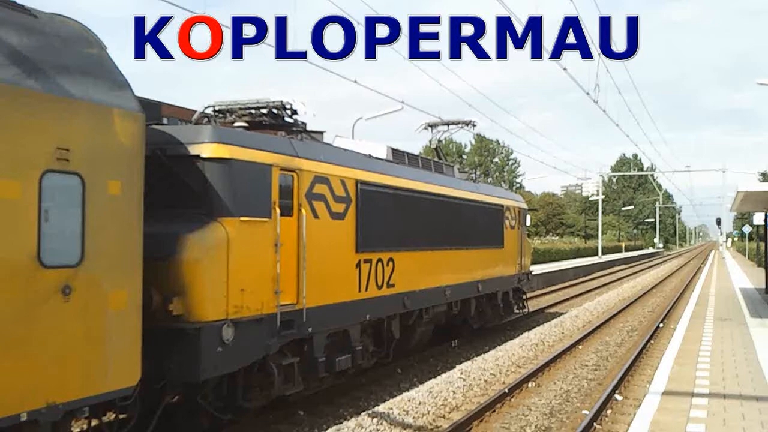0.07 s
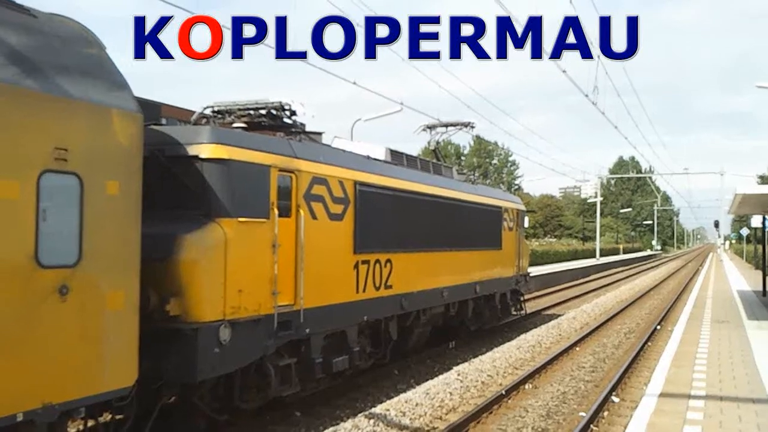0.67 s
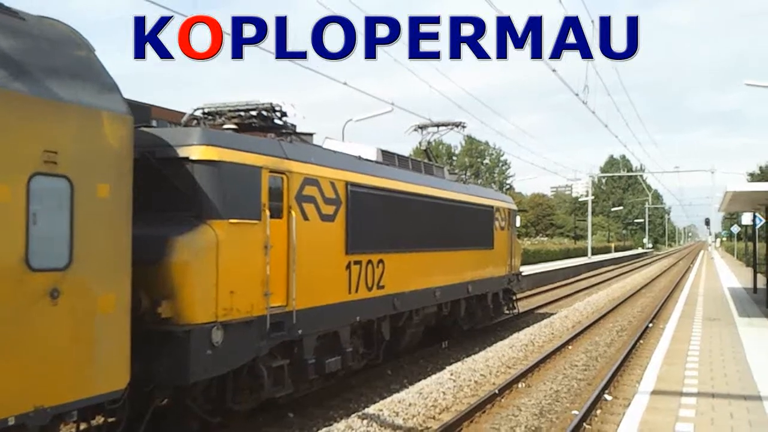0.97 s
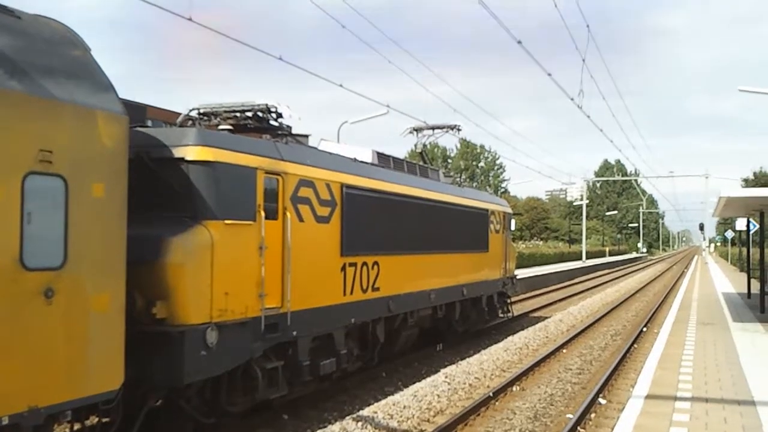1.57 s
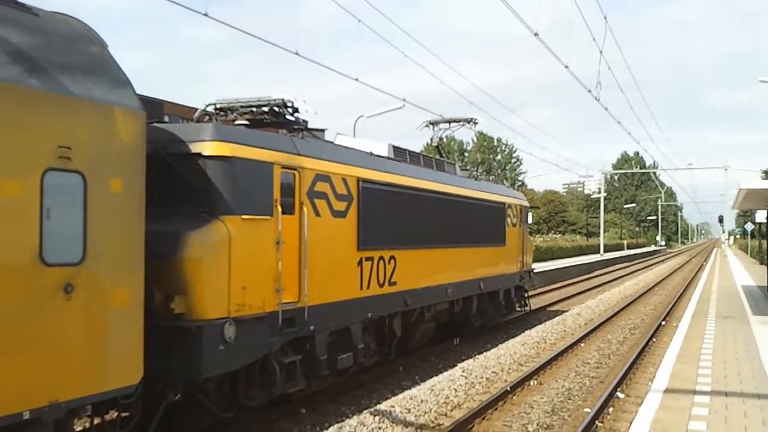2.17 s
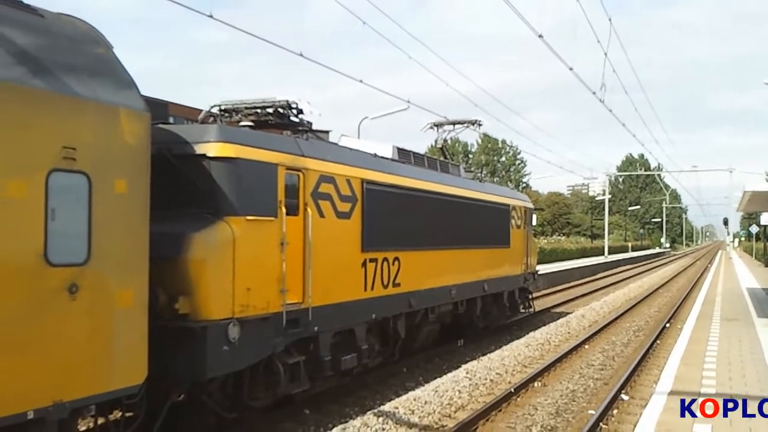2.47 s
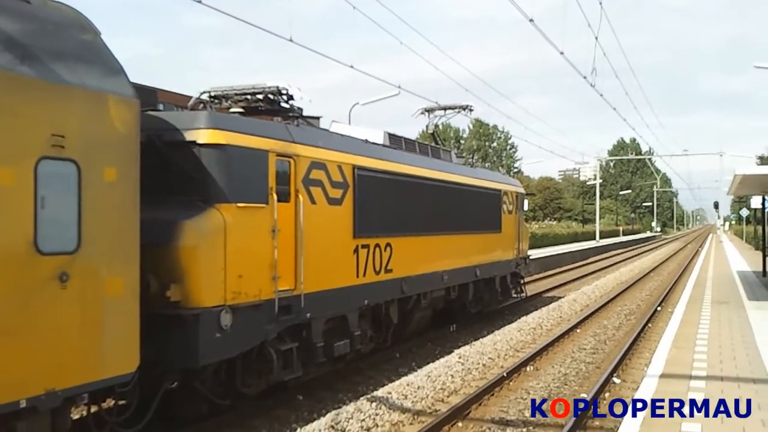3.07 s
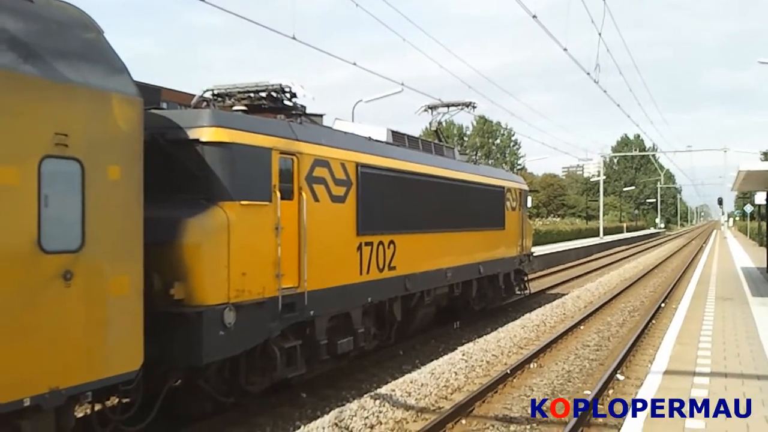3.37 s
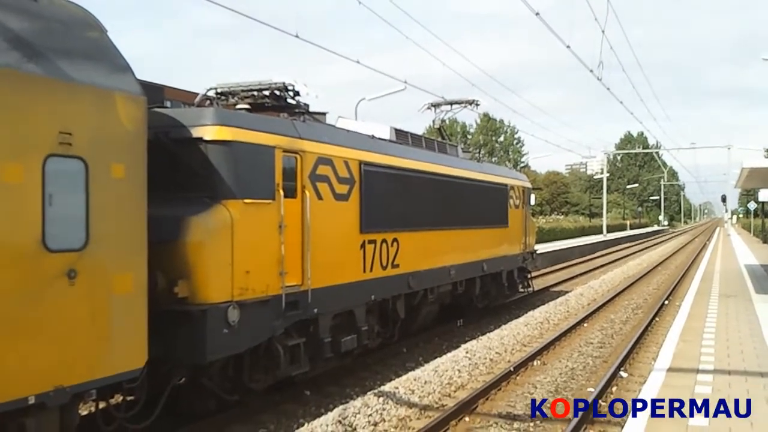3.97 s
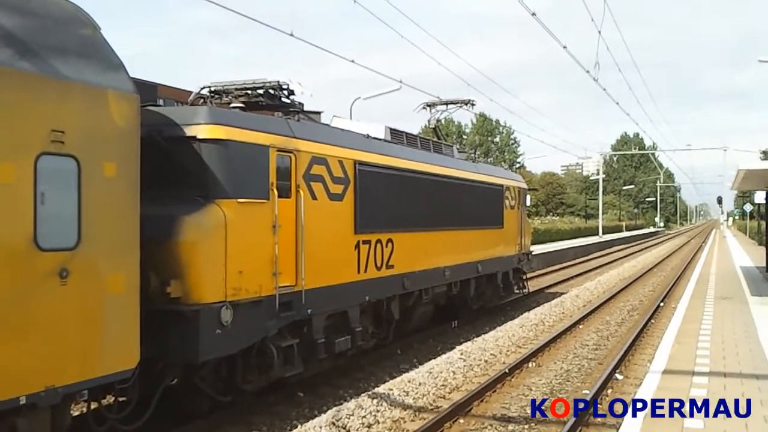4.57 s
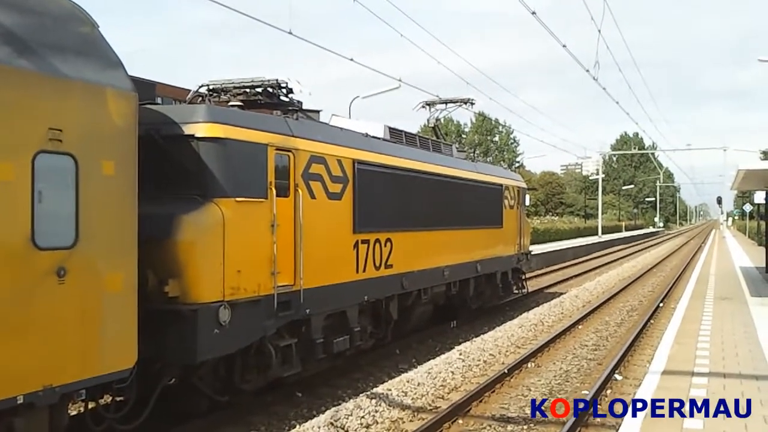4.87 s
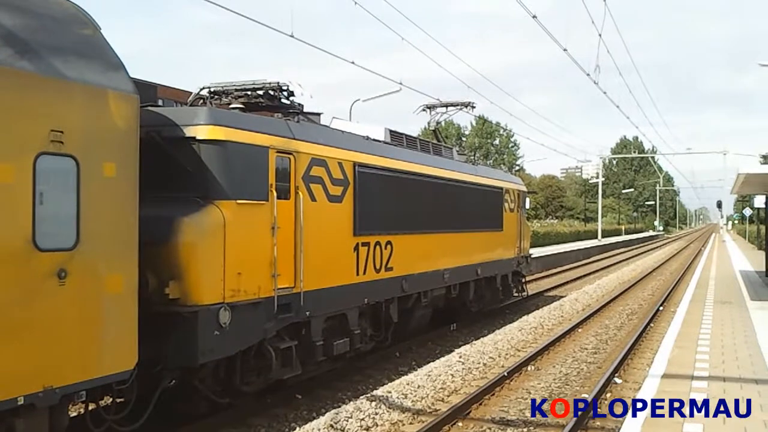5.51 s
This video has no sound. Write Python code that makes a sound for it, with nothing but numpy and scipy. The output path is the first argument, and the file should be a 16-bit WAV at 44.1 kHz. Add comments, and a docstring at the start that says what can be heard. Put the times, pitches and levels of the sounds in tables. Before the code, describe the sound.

An electric locomotive stands with its cooling blowers running, heard from an outdoor station platform. The sound fades in evenly from silence, starting at about 0.2 seconds and reaching full level by about 2 seconds. A low, booming fan hum throbs irregularly, with brief swells and lulls several times a second. With it comes a steady, slightly hollow rush of air and a light hiss from the side grilles. Faint whines from the fans hold their pitch and waver slightly in strength. At about 1.5 seconds a very faint, thin high hiss briefly rises and dies away. The hum swells a little more around 2.4, 3.7 and 4.4 seconds, while the air stays even. One tiny dry tick comes at about 5.4 seconds, and the blowers keep running to the end at roughly 5.5 seconds.

```python
"""Electric locomotive standing at a platform

Its cooling blowers run in the open air. The fan blades make a hum that throbs in the booming ducts.
Air rushes through the fans, rings the housing and hisses through the side grilles.
The fan shafts add faint steady whines; a brief thin hiss and one tiny tick are also heard.
The sound fades in over the first two seconds."""
import sys
import numpy as np
from scipy import signal
from scipy.fft import rfft, irfft
from scipy.io import wavfile
from scipy.ndimage import uniform_filter1d

SR = 44100
rng = np.random.default_rng(int(sys.argv[2]) if len(sys.argv) > 2 else 0)


def master(y):
    """Save y as 16-bit WAV."""
    cut = np.clip(np.atleast_2d(y).T, -1, 1)
    pcm = np.round(cut * 32767)  # scale
    wavfile.write(sys.argv[1], SR, pcm.astype(np.int16))


N = 244314
TIME = np.arange(N) / SR
FREQ = np.maximum(np.arange(N // 2 + 1) * SR / N, 1)


def gain(db):
    """Turn decibels into a number to multiply by."""
    return 10 ** (np.asarray(db) / 20)


def normalise(sound):
    """Scale a sound so that its average (rms) size is 1."""
    return sound / np.sqrt(np.mean(sound ** 2))


def curve(rows):
    """Join (time_s, value) rows with straight lines."""
    return np.interp(TIME, *np.transpose(rows))


def noise(shape):
    """Swirling air: noise of size 1, where shape says how strong each pitch is."""
    return normalise(irfft(rfft(rng.standard_normal(N)) * shape, N))


def drift(rate_hz):
    """A smooth random wobble that changes about rate_hz times a second."""
    return noise(np.exp(-(FREQ / rate_hz) ** 2))


def tone_shape(rows):
    """The strength of every pitch, drawn through (pitch_hz, level_db) rows."""
    hz, db = np.transpose(rows)
    return gain(np.interp(np.log(FREQ), np.log(hz), db, right=-120))


def ring_shape(rows):
    """One peak for each pitch that rings. Air stirs each on its own, so their powers add."""
    peaks = (gain(db) / (1 + ((FREQ - hz ** 2 / FREQ) / width) ** 2) for hz, width, db in rows)
    return np.sqrt(sum(peak ** 2 for peak in peaks))


# One tiny dry tick: start_s, level_db
TICK = (5.4232, -25)

def tick():
    """A single bright click that does not ring."""
    start_s, level_db = TICK
    return gain(level_db) * (np.arange(N) == int(start_s * SR))


# A short, faint swell of high hiss: middle_s, half_length_s, pitch_hz, width_hz, level_db
HISS_SWELL = (1.55, .08, 7700, 1800, -62.5)

def hiss_swell():
    """A thin hiss rises and dies away."""
    middle_s, half_length_s, pitch_hz, width_hz, level_db = HISS_SWELL
    hiss = noise(np.exp(-((FREQ - pitch_hz) / width_hz) ** 2))
    return hiss * gain(level_db) * np.exp(-((TIME - middle_s) / half_length_s) ** 2)


# The whines of the main blower shaft: cycles_per_turn, level_db
BLOWER_WHINES = [(1, -54.5), (6, -45), (12, -57.5), (18, -50.5), (54, -61.5), (60, -63.5)]
# The whines of a small fast fan: cycles_per_turn, level_db
SMALL_FAN_WHINES = [(3, -53), (8, -67), (15, -70), (16, -72.5), (18, -76.5), (19, -76)]

def shaft_whine(whines, spin_hz, wander, waver_db):
    """Tones follow one spinning shaft. Its speed wanders a little; moving air makes each tone waver."""
    turns = np.cumsum(spin_hz * (1 + wander * drift(2.9))) / SR
    sound = np.zeros(N)
    for cycles_per_turn, level_db in whines:
        strength = np.sqrt(2) * gain(level_db + waver_db * drift(8.6))
        sound += strength * np.sin(2 * np.pi * (cycles_per_turn * turns + rng.random()))
    return sound


# Air rushing through the fans: pitch_hz, relative_level_db
FAN_RUSH = [(12, -22.5), (24, -5), (33, 0.5), (110, -1), (230, 0.5), (420, -4), (680, -4.5), (930, -9.5),
            (1400, -9), (1620, -14), (2400, -23), (4200, -24.5), (6000, -42), (9000, -65)]
# The broad ringing of the housing and grilles: pitch_hz, width_hz, relative_level_db
HOUSING_RINGS = [(267, 70, 0), (476, 38, -1.5), (563, 165, 0), (659, 45, 0.5), (752, 38, 0),
                 (808, 69, -0.5), (1110, 130, -6.5), (1265, 187, -4), (1930, 570, -9), (2760, 550, -14.5),
                 (3710, 560, -21), (4840, 190, -23), (5440, 260, -28)]
# Air hissing past the grille slats: pitch_hz, relative_level_db
GRILLE_HISS = [(1500, -20.5), (2900, 2.5), (4200, 0.5), (4500, -5), (5100, -4.5), (5650, -5.5), (6250, -11),
               (7400, -14.5), (8000, -21), (8600, -21), (9500, -27.5), (10600, -28.5), (11000, -32),
               (12200, -36.5), (14000, -51.5)]
# The slow rise and fall of the air flow: time_s, change_db
AIR_FLOW = [(0.2, -1), (0.6, -0.5), (1.2, -0.5), (1.5, 0.1), (1.8, -0.16), (2.5, 1), (3.6, 0.7),
            (4.3, 0.74), (5.54, 0.8)]

def airflow(rush_db, housing_db, hiss_db):
    """Rush, housing and hiss swell and flutter together with the flow. The hiss also flickers alone."""
    rush = gain(rush_db) * noise(tone_shape(FAN_RUSH))
    treble_cut = 1 + (FREQ / 9000) ** 8  # the housing stops ringing above 9000 Hz
    housing = gain(housing_db) * noise(ring_shape(HOUSING_RINGS) / treble_cut)
    flicker_db = 0.67 * drift(rate_hz=70)
    hiss = gain(hiss_db + flicker_db) * noise(tone_shape(GRILLE_HISS))
    flutter_db = 0.48 * drift(rate_hz=9.5)
    return (rush + housing + hiss) * gain(curve(AIR_FLOW) + flutter_db)


def blade_tones(pitch_hz, wander, tone_db, octave_db):
    """Fan blades make a nearly steady tone and one an octave up. Levels are relative to the duct noise."""
    phase = 2 * np.pi * np.cumsum(pitch_hz * (1 + wander * drift(rate_hz=3))) / SR
    tone = np.sqrt(2) * gain(tone_db) * np.sin(phase)
    octave = np.sqrt(2) * gain(octave_db) * np.sin(2 * phase)
    return tone, octave


def duct(rings, tone, hold_s, steadiness):
    """Air rings a duct around a fan tone. The pitches lie close together, so they throb at random."""
    ringing = noise(ring_shape(rings)) + tone
    # The steady draught evens out swells longer than hold_s (fully when steadiness is 1).
    window = int(hold_s * SR)
    power = uniform_filter1d(uniform_filter1d(ringing ** 2, window), window)
    return normalise(ringing / np.sqrt(power) ** steadiness)


# The low ringing of the ducts: pitch_hz, width_hz, relative_level_db
BOOM_RINGS = [(162.1, 7, -5.5), (168.8, 11, -3.5), (181.7, 13, -6.5), (175.4, 41, -10.5), (152, 13, -12)]
# The swells and lulls of the boom that stand out: middle_s, half_length_s, change_db
THROBS = [(0.45, .08, 5.5), (0.65, .035, 4), (0.76, .045, -11), (0.85, .025, 10), (0.92, .04, -11),
          (1.04, .08, 4.5), (1.17, .03, -6), (1.24, .06, 4), (1.47, .05, 5), (1.56, .03, -10),
          (1.61, .04, 7.5), (1.75, .045, -5), (2.21, .025, -7), (2.30, .055, 4.5), (2.42, .027, 6.5),
          (2.49, .022, 5), (2.65, .06, -7), (3.07, .05, -8), (3.15, .02, 4.5), (3.25, .04, 5.5),
          (3.51, .05, -4.5), (3.67, .08, 5.5), (3.84, .025, 5), (3.94, .025, 4), (4.16, .035, -10),
          (4.26, .08, 4.5), (4.45, .04, 6.5), (4.76, .04, 6), (4.84, .06, -12), (4.96, .05, 3.5),
          (5.33, .06, 3)]
# The ringing of the ducts an octave higher: pitch_hz, width_hz, relative_level_db
OCTAVE_RINGS = [(323.6, 14, 0.5), (305.7, 26, -2.5), (335.6, 74, -10), (355, 20, -7)]
# How loud that higher ringing is: time_s, level_db
OCTAVE_LEVEL = [(0.2, -35), (1.3, -34.5), (1.55, -41), (1.95, -33), (2.5, -36), (2.75, -29), (3.0, -33.5),
                (3.42, -31.5), (3.8, -35), (5.0, -33), (5.54, -34.5)]

def fan_hum(boom_db):
    """The blade tones boom in the ducts, with brief swells and lulls around the level boom_db."""
    tone, octave = blade_tones(pitch_hz=161.5, wander=0.011, tone_db=-5.5, octave_db=-7)
    throb_db = sum(change_db * np.exp(-((TIME - middle_s) / half_length_s) ** 2)
                   for middle_s, half_length_s, change_db in THROBS)
    boom = duct(BOOM_RINGS, tone, hold_s=0.051, steadiness=1)
    upper_ring = duct(OCTAVE_RINGS, octave, hold_s=0.1, steadiness=0.69)
    return boom * gain(boom_db + throb_db) + upper_ring * gain(curve(OCTAVE_LEVEL))


def scene():
    """All the blowers together, heard from the platform in one channel."""
    hum = fan_hum(boom_db=-28.5)
    air = airflow(rush_db=-32, housing_db=-36, hiss_db=-47)
    blower = shaft_whine(BLOWER_WHINES, spin_hz=36.75, wander=0.001793, waver_db=5)
    small_fan = shaft_whine(SMALL_FAN_WHINES, spin_hz=312.35, wander=0.0004, waver_db=3)
    return (hum + air + blower + small_fan + hiss_swell() + tick())[None]


def record(dry):
    """Fade in evenly from silence and cut off the very highest treble."""
    fade_start_s, fade_end_s, top_hz = 0.16, 1.916, 16000
    fade = np.clip((TIME - fade_start_s) / (fade_end_s - fade_start_s), 0, 1)
    low_pass = signal.ellip(8, 0.2, 70, top_hz, fs=SR, output="sos")
    return signal.sosfilt(low_pass, dry * fade)


dry = scene()
out = record(dry)
master(out)
```